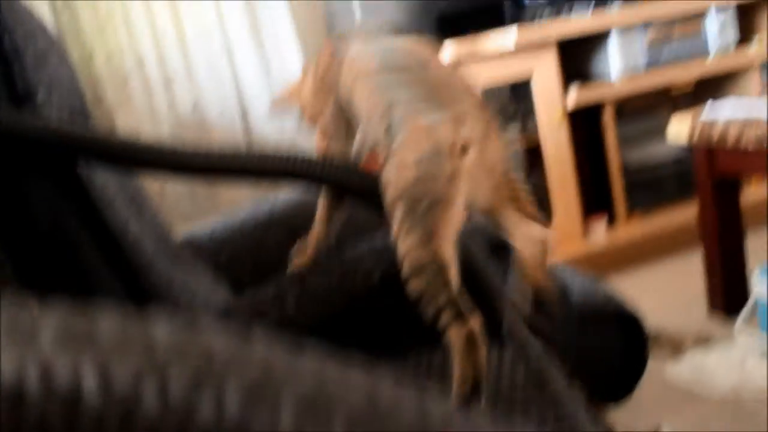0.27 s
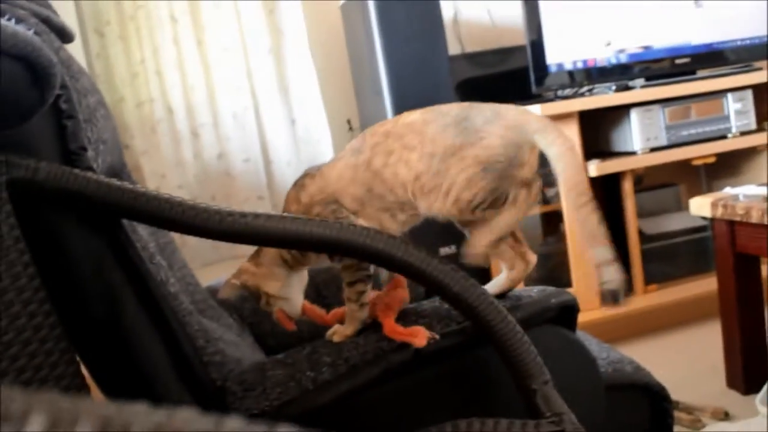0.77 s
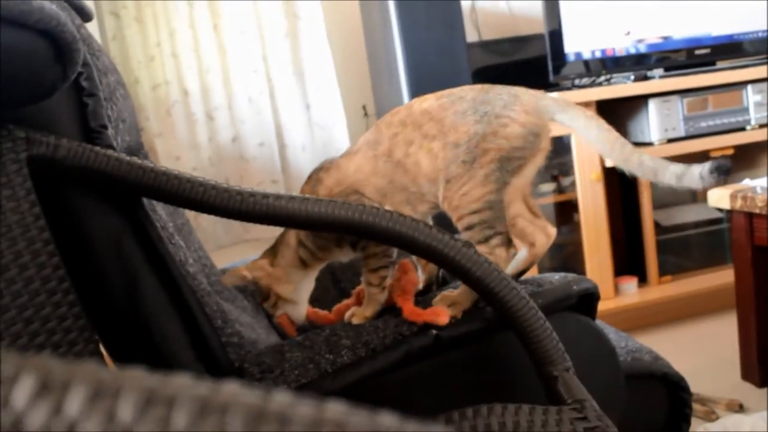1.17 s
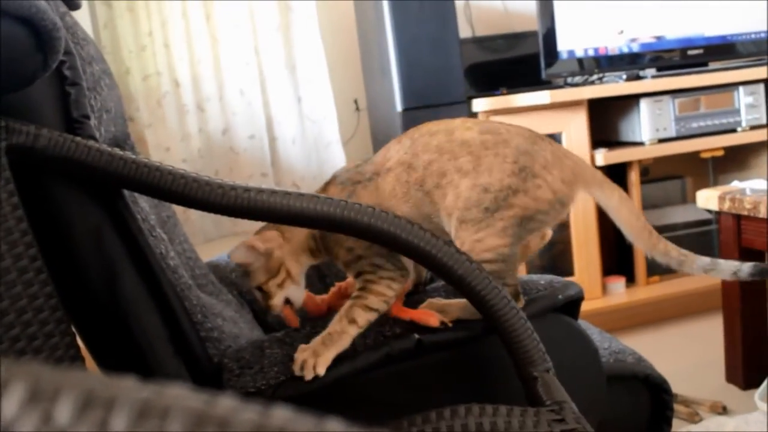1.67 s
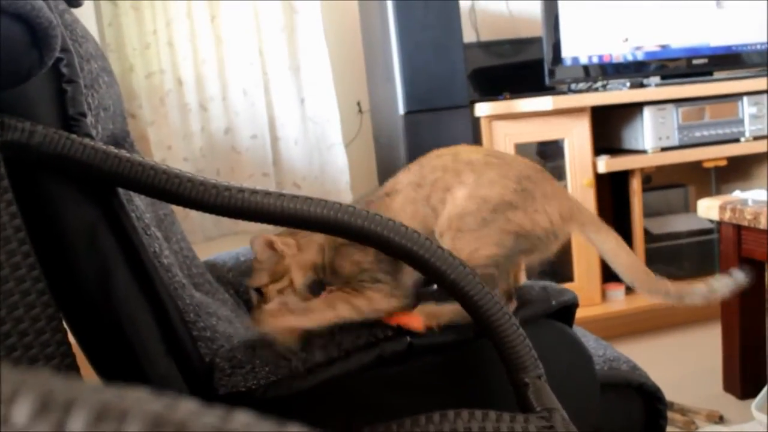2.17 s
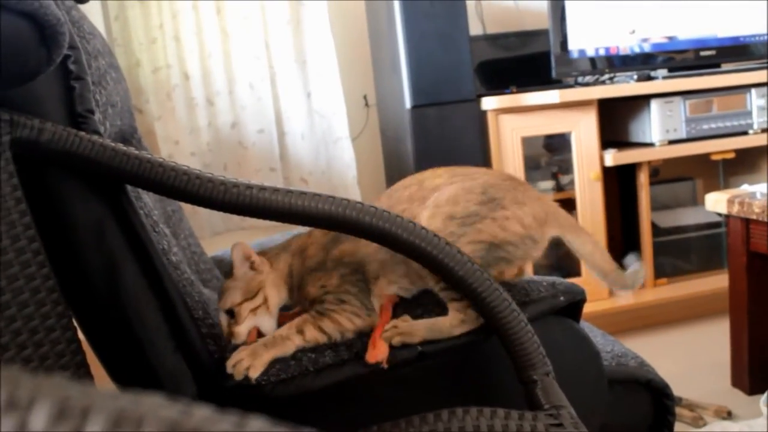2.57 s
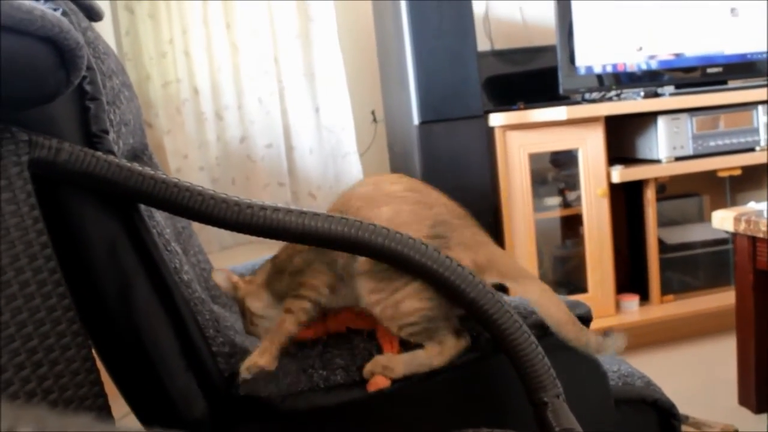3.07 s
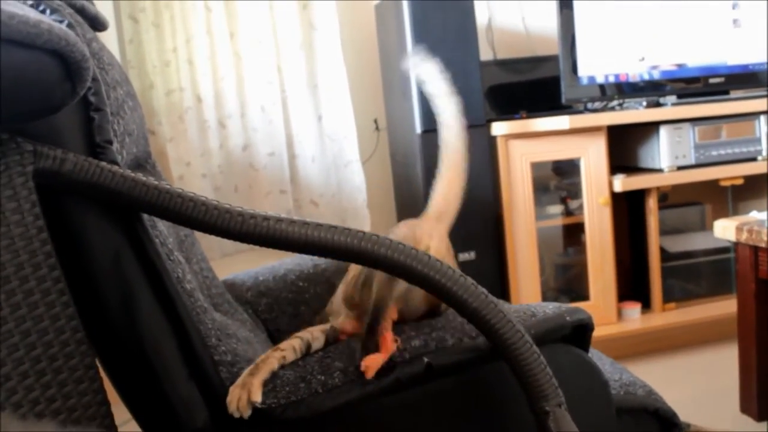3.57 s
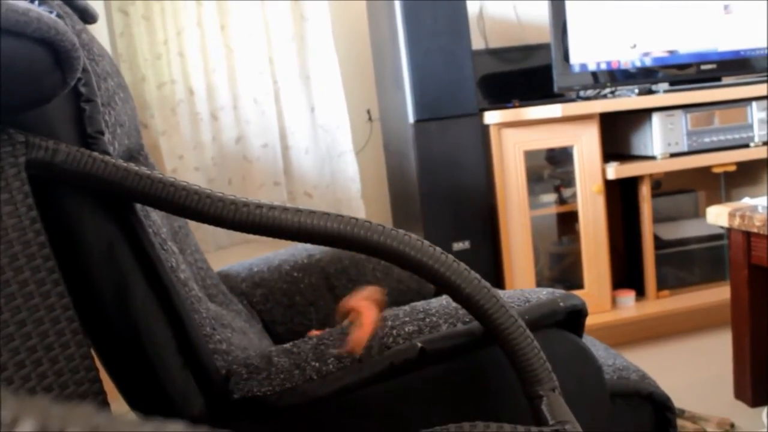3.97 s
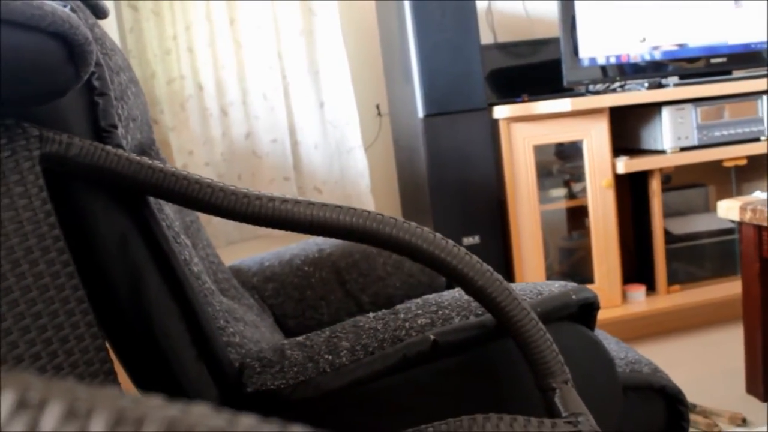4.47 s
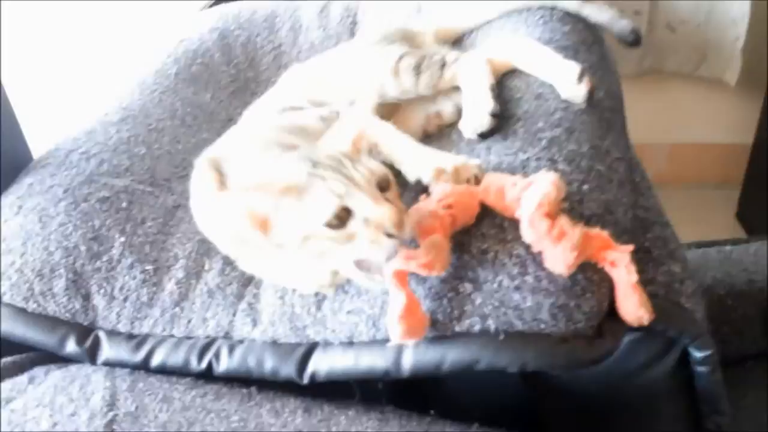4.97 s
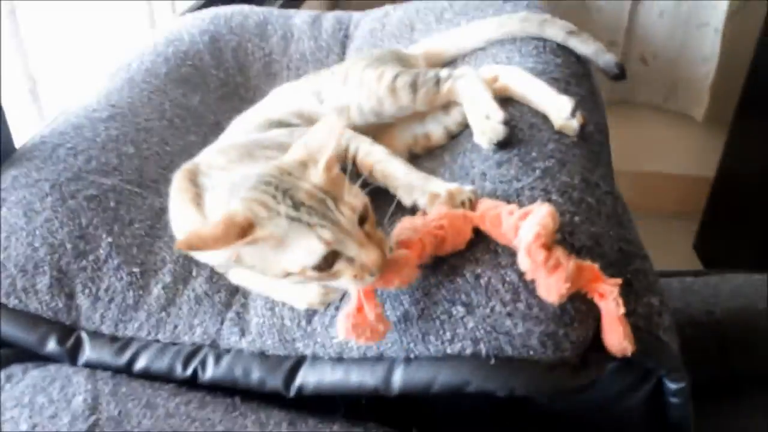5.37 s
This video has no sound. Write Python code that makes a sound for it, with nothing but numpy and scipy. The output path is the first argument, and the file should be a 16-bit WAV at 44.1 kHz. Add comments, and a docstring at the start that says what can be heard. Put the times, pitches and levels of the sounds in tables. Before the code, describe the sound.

A kitten gives two long sharp hisses, then paws knock and claws tick on an armchair while everything slowly fades to silence.

```python
"""Quiet living room: a kitten on a padded armchair hisses twice, long and sharp, and later puffs once.
Hisses and puff are shaped noise; blows of paws ring frame and seat, claws tick, fur rubs cloth as
grainy noise. Room murmur, steady hiss and low wavering tones lie beneath. The whole scene fades slowly
to silence, which leaves the puff faint, then starts to fade in again on a rub of cloth."""
import sys
import numpy as np
from scipy import signal
from scipy.fft import rfft, irfft, next_fast_len
from scipy.io import wavfile
from scipy.ndimage import uniform_filter1d, map_coordinates

SR = 44100
rng = np.random.default_rng(int(sys.argv[2]) if len(sys.argv) > 2 else 0)


def ratio(d):
    """dB to gain"""
    e = np.asarray(d, float) / 20
    return 10 ** e


def put_to_file(sound):
    """Save the sound as 16-bit audio at rate SR, in the file named by the first command-line argument."""
    columns = np.atleast_2d(sound).T  # one column per channel
    safe = np.clip(columns, -1, 1)
    whole_steps = np.round(safe * 32767)
    wavfile.write(sys.argv[1], SR, whole_steps.astype(np.int16))


N = 248283

# course of each hiss: time_s, effort_db, cavity_hz, teeth_whistle_hz, whistle_over_cavity_db
HISS_COURSES = [
    [(.44, -51, 4470, 5070, -7.5), (.51, -23.5, 4760, 5430, 6.5), (.56, -22, 5160, 5310, 8.5),
     (.606, -19, 4630, 5040, 11), (.71, -27, 4310, 5110, 0.5), (.8, -25.5, 4090, 4800, 2.5),
     (.926, -26, 4010, 4820, 4.5), (1.0, -35, 3920, 4860, 3), (1.134, -46.5, 4150, 4780, 2.5),
     (1.26, -45, 4570, 4830, 6.5)],
    [(1.316, -41.5, 3550, 5150, 13.5), (1.322, -29, 3480, 4960, 17), (1.352, -21.5, 3570, 4740, 25.5),
     (1.38, -29, 3470, 5120, 6.5), (1.41, -30.5, 4000, 5000, -4), (1.47, -33, 4220, 5250, -3.5),
     (1.58, -32.5, 3850, 5400, -6), (1.63, -28, 3770, 5120, 4.5), (1.74, -30, 3640, 5030, -1.5),
     (1.87, -30.5, 3540, 4890, -3.5), (2.03, -35.5, 3410, 4780, -1), (2.13, -33.5, 2785, 3980, -5.5),
     (2.27, -39, 2845, 3800, -6), (2.37, -52.5, 2830, 4100, 0), (2.5, -59, 2860, 4120, -5)],
]


def unit(x):
    """Scaled to rms 1."""
    return x / np.sqrt(np.mean(x ** 2) + 1e-20)


def along(points, hz):
    """(Hz, value) points interpolated on a log frequency axis."""
    point_hz, value = np.transpose(points)
    return np.interp(np.log(hz + 1), np.log(point_hz + 1), value)


def wobble(knots_per_s):
    """A smooth random curve through normally distributed knots."""
    knots = rng.standard_normal(int(N * knots_per_s / SR) + 4)
    return map_coordinates(knots, [np.arange(N) * knots_per_s / SR])


def filtered(x, response):
    """x times a complex response of frequency."""
    size = next_fast_len(N + SR // 2)
    return irfft(rfft(x, size) * response(np.fft.rfftfreq(size, 1 / SR)), size)[:N]


def modes(table):
    """Causal response of (Hz, width Hz, dB) resonances, alternating in sign."""
    def response(f):
        return sum((-1) ** k * ratio(db) * 1j * f * width / (centre ** 2 - f * f + 1j * f * width)
                   for k, (centre, width, db) in enumerate(table))
    return response


def noise(spectrum, grain=0.):
    """Coloured noise of rms 1; grain makes it spiky."""
    spikes = np.exp(grain * wobble(900))
    return unit(filtered(spikes * rng.standard_normal(N), lambda hz: ratio(along(spectrum, hz))))


def envelope(start_s, rise_s, hold_s, sag_db, fall_db_per_s):
    """Gain that rises, sags while held, then dies away."""
    t = np.arange(N) / SR - start_s
    rise = np.clip(t / rise_s, 0, 1) ** 2
    held = np.clip((t - rise_s) / hold_s, 0, 1)
    return rise * ratio(-sag_db * held - fall_db_per_s * np.maximum(t - rise_s - hold_s, 0))


def hiss():
    """Air forced past tongue and teeth: noise through steep resonances that slide as the mouth moves."""
    # breath noise passing between the resonances: pitch_hz, level_over_cavity_db
    breath_floor = [(200, -50.5), (1500, -42.5), (2600, -28), (3500, -32), (6200, -17), (9000, -19),
                    (11000, -39.5), (13000, -36.5), (16000, -35.5)]
    hz, t, z = signal.stft(rng.standard_normal(N), SR, nperseg=512, noverlap=384)
    power = ratio(along(breath_floor, hz[:, None])) ** 2
    for centre_hz, width_hz, db in mouth(t):
        off = 2 * (hz[:, None] - centre_hz) / width_hz
        # steep sides; low resonances trail a long upper skirt
        steepness = np.where((off > 0) & (centre_hz < 4500), 1.1, 2.5)
        power = power + ratio(db) ** 2 / (1 + off ** 2) ** steepness
    # eddies brighten thin strips of the spectrum for a moment
    eddies = uniform_filter1d(rng.standard_normal(z.shape), 3, axis=0)
    eddies = uniform_filter1d(eddies, 24, axis=1)
    shaped = z * np.sqrt(power / power.mean(axis=0)) * ratio(3.1 * unit(eddies))
    jet = signal.istft(shaped, SR, nperseg=512, noverlap=384)[1][:N]
    flutter = ratio(0.15 * wobble(40) + 0.48 * wobble(150))  # the jet is unsteady
    time_s, effort_db = np.transpose(sum(HISS_COURSES, []))[:2]
    effort = ratio(np.interp(np.arange(N) / SR, time_s, effort_db, -200, -200))
    return effort * flutter * jet


def mouth(t):
    """(Hz, width Hz, dB over cavity) of throat, cavity, teeth, cavity overtone and lips at times t."""
    # a wider gape is higher and more damped: cavity_hz, width_hz
    cavity_widths = [(2900, 89), (3500, 160), (3900, 510), (4200, 460), (5000, 590)]
    # the cavity's second mode, fainter at a wide gape: cavity_hz, level_over_cavity_db
    overtone_levels = [(2800, 4), (2950, -3.5), (3300, -6.5), (4100, -12.5), (4600, -22.5), (5000, -29.5)]
    # lips close in after the first burst: time_s, pitch_hz, level_over_cavity_db (before whistle lead)
    lip_course = [(.5, 11660, -21.5), (.85, 11550, -21.5), (1.15, 10140, -8), (1.6, 10210, -16),
                  (2.45, 9730, -14.5)]
    time_s, _, *columns = np.transpose(sum(HISS_COURSES, []))
    cavity_hz, teeth_hz, teeth_db = (np.interp(t, time_s, c) for c in columns)
    time_s, *columns = np.transpose(lip_course)
    lips_hz, lips_db = (np.interp(t, time_s, c) for c in columns)
    # the louder the whistle, the narrower
    teeth_width_hz = np.clip(950 * ratio(-0.6 * teeth_db), 150, 1000)
    lead_db = np.maximum(teeth_db, 0)  # throat and lips grow with a strong whistle
    # the throat shows briefly as a hiss opens
    throat_after_s, throat_half_s = .07, .04
    opening = sum(np.exp(-((t - rows[0][0] - throat_after_s) / throat_half_s) ** 2)
                  for rows in HISS_COURSES)
    throat_db = -26 + lead_db + 20 * np.log10(opening + 1e-3)
    return [(2650 + 0 * t, 300, throat_db),
            (cavity_hz, along(cavity_widths, cavity_hz), 0),
            (teeth_hz, teeth_width_hz, teeth_db),
            (1.92 * cavity_hz, 560, along(overtone_levels, cavity_hz)),
            (lips_hz, 1180, lips_db + 0.24 * lead_db)]


def puff():
    """A wide mouth leaves one short broad band of rushing air."""
    # pitch_hz, relative_db_per_hz
    puff_colour = [(1500, -37), (2200, -23), (2600, -14), (2900, -17), (3250, -11.5), (3900, -14.5),
                   (4400, -3.5), (5400, -2), (6800, 0.5), (9000, -8), (11000, -23), (16000, -21.5)]
    breath = ratio(-23.5) * envelope(4.532, rise_s=.05, hold_s=.145, sag_db=0.5, fall_db_per_s=497)
    return breath * ratio(0.98 * wobble(73)) * noise(puff_colour, grain=.2)


def knocks():
    """A paw blow rings the frame and thuds the seat; a claw scrapes out a tick."""
    # paw blows: time_s, frame_peak_db, seat_peak_db, contact_ms (push rise is a share of it)
    blow_times = [(2.253, -19, -61, 6.5), (2.262, -25, -45, 2.7), (2.431, -17.5, -29, 3.7),
                  (2.536, -49, -60, 2.8), (2.68, -31.5, -65, 6.8), (2.714, -37, -43, 11),
                  (3.03, -37.5, -40, 3.8), (3.065, -31, -40, 7.5), (3.117, -29, -45, 6.9),
                  (3.159, -28, -60, 6), (3.173, -7.5, -25, 5.9), (3.197, -15, -34, 6.6),
                  (3.208, -22, -28, 8.1), (3.32, -19.5, -27, 2.2), (3.528, -35, -49, 5.1),
                  (3.633, -34, -54, 3.5), (3.668, -19.5, -42, 4.2), (3.673, -28, -54, 8.4),
                  (3.684, -18.5, -36, 10), (3.699, -44, -40.5, 17), (3.952, -11, -27.5, 19.4),
                  (3.961, -11.5, -28.5, 10), (3.992, -12, -19, 8.6), (5.267, -40, -39, 5.9)]
    # claws catching: time_s, peak_db
    claw_times = [(2.253, -32), (2.262, -27), (2.4, -30.5), (2.412, -42), (2.494, -40), (2.535, -33),
                  (2.681, -32.5), (2.716, -43), (3.066, -36.5), (3.117, -51.5), (3.174, -16), (3.198, -12),
                  (3.21, -49), (3.674, -31.5), (3.803, -32.5), (3.954, -11), (3.961, -5.5), (3.993, -24),
                  (4.201, -41.5), (5.017, -35), (5.214, -32.5), (5.228, -26.5), (5.265, -33.5),
                  (5.426, -21)]
    # resonances of wooden frame, padded seat and claw tick: pitch_hz, width_hz, level_db
    frame_modes = [(556, 176, -3.5), (1030, 210, 9.5), (1370, 450, 2.5), (1807, 333, 5.5),
                   (2600, 2290, -2.5)]
    seat_modes = [(142, 68, -4), (343, 56, 7.5)]
    claw_modes = [(3312, 1900, -4), (6740, 1500, 0.5), (9074, 6200, -8)]

    def padded(table):
        """A soft pad sends little treble, a small chair little deep bass."""
        def response(hz):
            pad = 1 / (1 + 1j * hz / 3000) ** 2
            small_chair = (1j * hz / (90 + 1j * hz)) ** 2
            return modes(table)(hz) * pad * small_chair
        return response

    out = np.zeros(N)
    for time_s, frame_db, seat_db, contact_ms in blow_times:
        out += strike(time_s, frame_db, 0.21 * contact_ms, 0.48, padded(frame_modes))
        out += strike(time_s, seat_db, 0.41 * contact_ms, 0.65, padded(seat_modes))
    for time_s, peak_db in claw_times:
        out += strike(time_s, peak_db, 0.55, 24, modes(claw_modes))
    return out


def strike(time_s, peak_db, rise_ms, rough, body):
    """One short rough push rings a body, and the walls answer."""
    t = np.arange(SR // 10) / SR
    u = t / (rise_ms / 1000)
    push = (1 + rough * rng.standard_normal(len(t))) * u * np.exp(-u)
    response = body(np.fft.rfftfreq(2 * len(t), 1 / SR))
    ring = irfft(rfft(push, 2 * len(t)) * response)[:len(t)]
    heard = ratio(-5.5) * echoes(ring)
    heard[:len(t)] += ring
    return np.pad(ratio(peak_db) * heard / np.abs(ring).max(), (round(time_s * SR), N))[:N]


def rubbing():
    """Fur and paws drag over cloth: a grainy rustle above a duller scuff."""
    # strokes of fur on cloth: start_s, length_s, rustle_db, scuff_db
    stroke_times = [(-.05, 0.13, -48, -47.5), (0.102, 0.01, -55.5, -41), (0.312, 0.027, -57.5, -50.5),
                    (0.339, 0.032, -47, -61.5), (0.354, 0.17, -54, -52), (0.455, 0.11, -68.5, -56),
                    (0.513, 0.019, -68.5, -41), (.555, 0.0066, -61.5, -44), (0.688, 0.34, -68.5, -53),
                    (2.335, 0.15, -50, -57), (2.46, 0.42, -51.5, -50.5), (3.071, 0.14, -50, -54),
                    (3.18, 0.2, -54, -44), (3.353, 0.6, -59, -54), (4.051, 0.19, -49, -65),
                    (4.55, 0.14, -46, -44.5), (4.916, 0.374, -48, -48), (5.252, 0.0715, -35, -48.5),
                    (5.292, 0.16, -30, -35.5), (5.45, 0.19, -45, -48)]
    # pitch_hz, relative_db_per_hz
    rustle_colour = [(880, -38.5), (1500, -1), (3310, -3), (7320, -4.5), (10500, -11.5), (13500, -17.5),
                     (16000, -19)]
    scuff_colour = [(200, -19.5), (400, 0), (800, -4), (1300, -6.5), (1800, -25), (3000, -25), (5000, -60)]
    rise_share = 0.31  # of the length; the rest is held
    rustle, scuff = np.zeros(N), np.zeros(N)
    for start_s, length_s, rustle_db, scuff_db in stroke_times:
        stroke = envelope(start_s, rise_share * length_s, (1 - rise_share) * length_s,
                          sag_db=2.5, fall_db_per_s=255.5)
        rustle += ratio(rustle_db) * stroke
        scuff += ratio(scuff_db) * stroke
    rustle = rustle * ratio(1.4 * wobble(70)) * noise(rustle_colour, grain=0.22)
    scuff = scuff * ratio(1.2 * wobble(60)) * noise(scuff_colour, grain=0.077)
    return rustle + scuff


def echoes(x):
    """Walls answer a short sound 6 ms late; each frequency dies at its own speed, in a fresh tail."""
    # pitch_hz, t60_s
    decay_times = [(150, 0.83), (1000, 0.61), (3000, 0.56), (8000, 0.4), (15000, 0.15)]
    hz, t, z = signal.stft(rng.standard_normal(SR * 2 // 3), SR, nperseg=256)
    decay = ratio(-60 * t / along(decay_times, hz)[:, None])
    tail = signal.istft(z * decay, SR, nperseg=256)[1]
    return np.pad(signal.fftconvolve(x, tail / np.linalg.norm(tail)), (260, 0))


def room(x):
    """The echoes of a long sound, a third of a second at a time."""
    out, step = np.zeros(N + 2 * SR), SR // 3
    for start in range(0, N, step):
        wet = echoes(x[start:start + step])
        out[start:][:len(wet)] += wet
    return out[:N]


def air():
    """Room murmur, the microphone's own hiss and low tones that waver."""
    # pitch_hz, relative_db_per_hz
    murmur_colour = [(18, -41.5), (30, -21.5), (64, -13), (103, -13), (129, -12.5), (219, 1), (419, -5),
                     (499, -10), (1060, -13), (2000, -16), (2600, -53.5), (4400, -120)]
    hiss_colour = [(1180, -32), (2000, -10.5), (2200, -2), (7510, -9.5), (14800, -19), (16000, -13)]
    # the murmur swells while the chair is stirred: centre_s, half_width_s (to 1/e of the dB), rise_db
    stirs = [(0, 0.12, 3), (.43, 0.049, 3), (.85, 0.25, 4), (2.2, .3, 2.5), (5.63, 0.54, 3.5)]
    # low hums that come and go: full_from_s, held_s, mean_pitch_hz, mean_level_db
    hums = [(0, 3.5, 94.3, -61.5), (0, 1.9, 72.6, -70.5), (2.14, 0.86, 70.2, -55), (3.338, 1.2, 72.9, -57)]
    t = np.arange(N) / SR
    stir_db = sum(db * np.exp(-((t - s) / width) ** 2) for s, width, db in stirs)
    murmur = ratio(-48.5 + stir_db + 0.14 * wobble(4.9)) * noise(murmur_colour)
    rise_s = .2
    tones = np.zeros(N)
    for full_from_s, held_s, pitch_hz, level_db in hums:
        gate = envelope(full_from_s - rise_s, rise_s, held_s, sag_db=0, fall_db_per_s=83.5)
        phase = 2 * np.pi * np.cumsum(pitch_hz + 2.9 * wobble(1.9)) / SR
        tones += ratio(level_db + 1.3 * wobble(4.2)) * gate * np.sin(phase)
    return murmur + ratio(-55) * noise(hiss_colour) + tones


def scene():
    """Cat and chair in the room."""
    cat = hiss()
    cat_echo = room(ratio(-4.5) * cat)
    return (cat + cat_echo + knocks() + puff() + rubbing() + air())[None]


def top_cut(x):
    """Nothing passes above the cut-off."""
    return signal.sosfilt(signal.butter(12, 16650, fs=SR, output="sos"), x)


def record(dry):
    """The fades, a band limit at both ends, a trace of converter noise, nothing at all between the fades."""
    # time_s, gain
    fade_points = [(0, 1), (4.808, 0), (4.918, 0), (5.63, .11)]
    fade = np.interp(np.arange(N) / SR, *np.transpose(fade_points))
    converter_noise = ratio(-100) * rng.standard_normal(N)

    def band(hz):
        return (hz < 15830) / (1 + (45 / (hz + 1)) ** 4) ** .5

    kept = filtered(fade * dry[0] + converter_noise, band)
    return top_cut((kept * (fade > 0))[None])


dry = scene()
out = record(dry)
put_to_file(out)
```